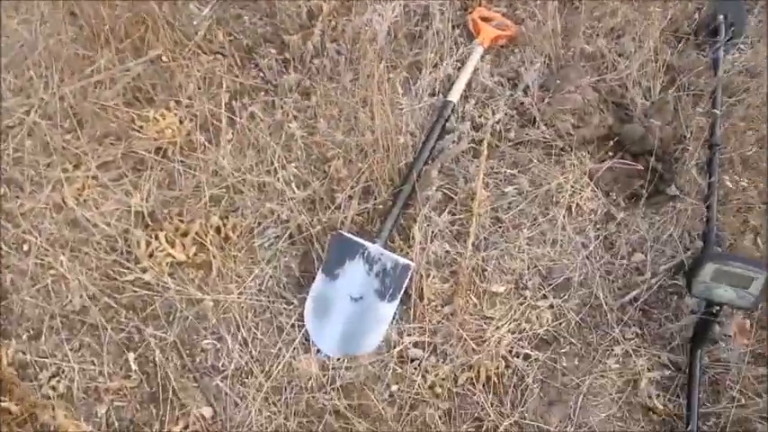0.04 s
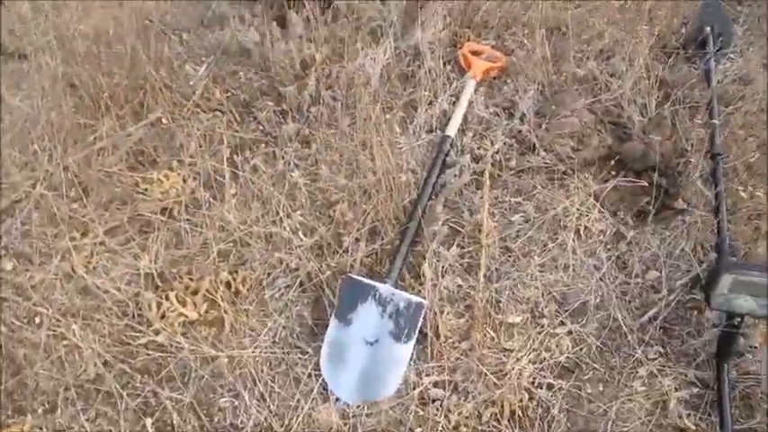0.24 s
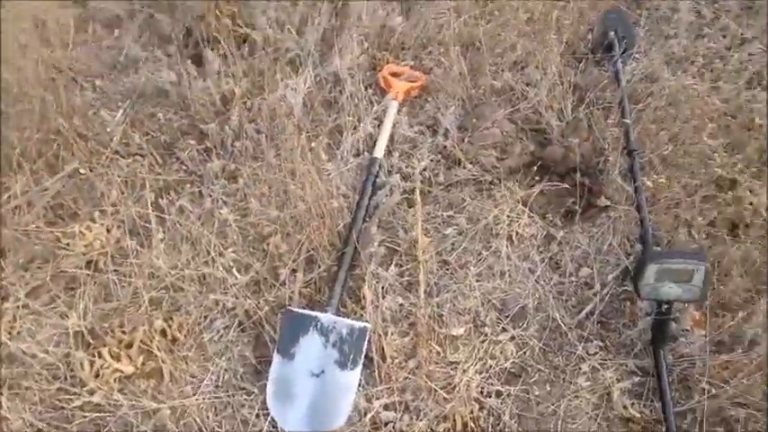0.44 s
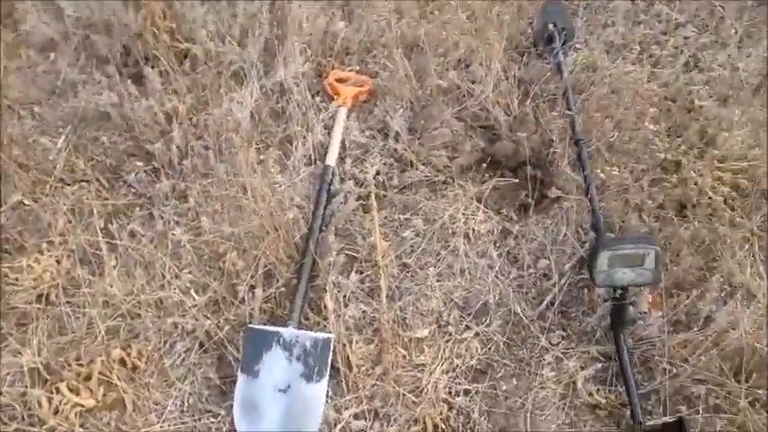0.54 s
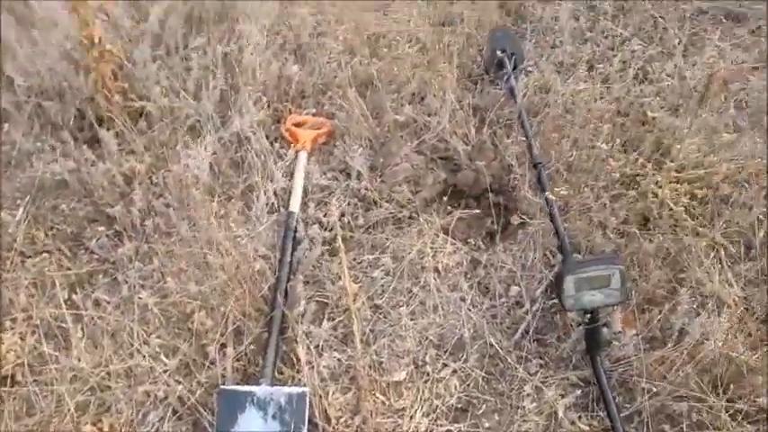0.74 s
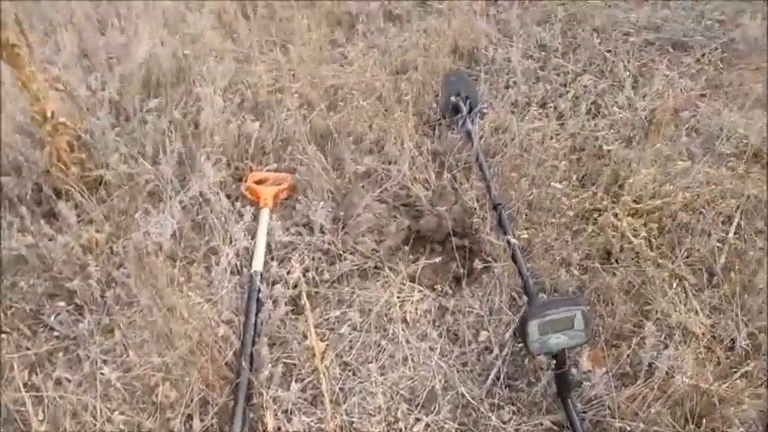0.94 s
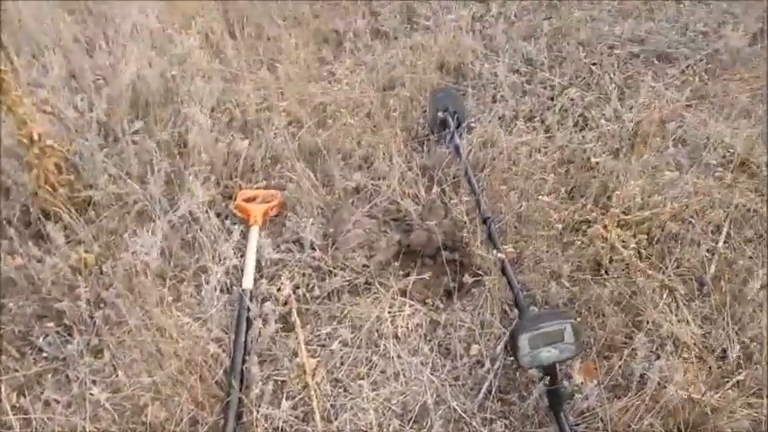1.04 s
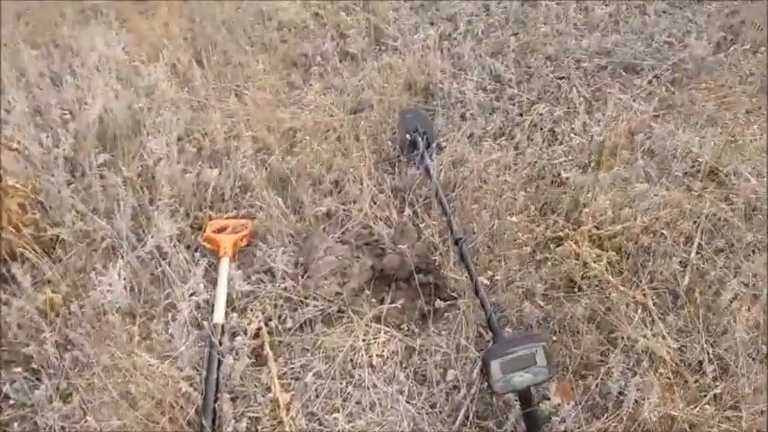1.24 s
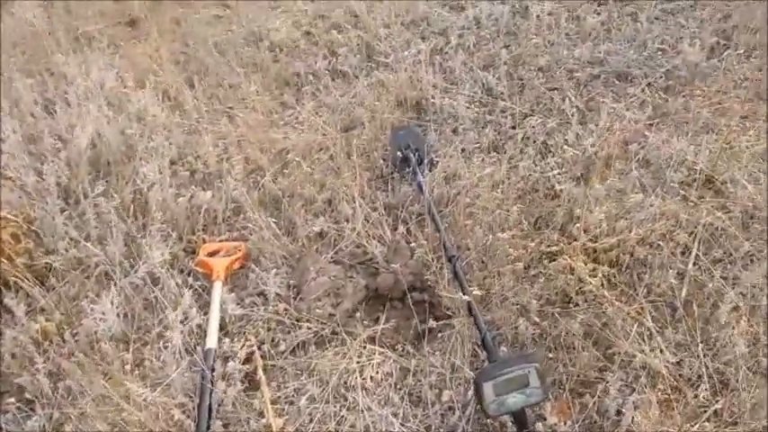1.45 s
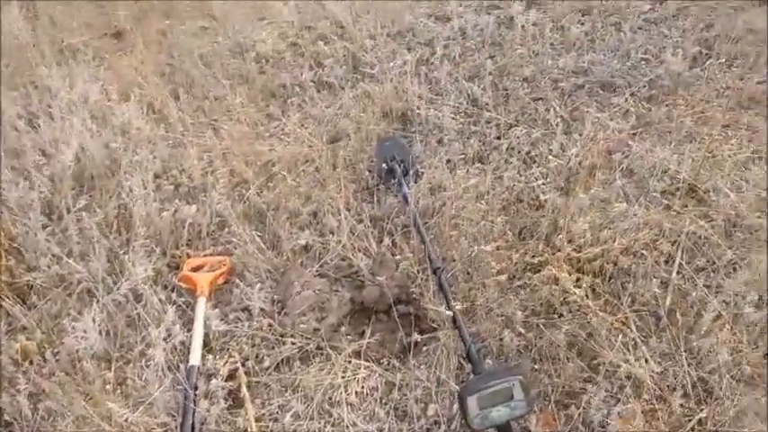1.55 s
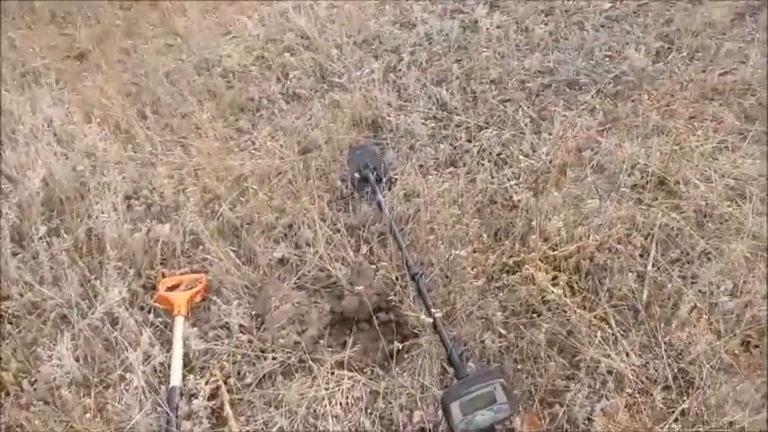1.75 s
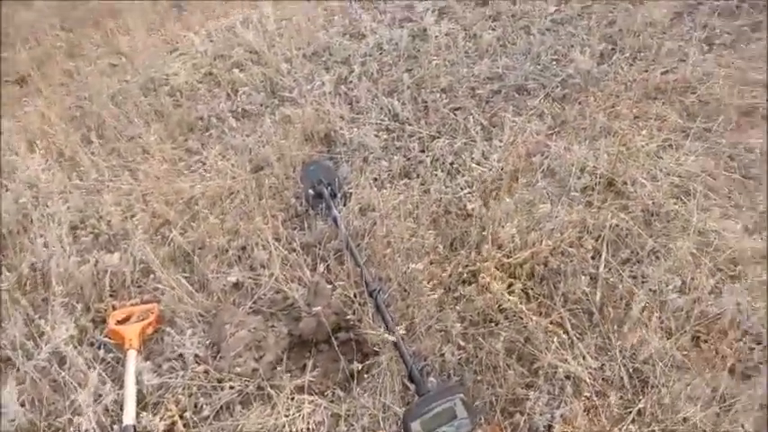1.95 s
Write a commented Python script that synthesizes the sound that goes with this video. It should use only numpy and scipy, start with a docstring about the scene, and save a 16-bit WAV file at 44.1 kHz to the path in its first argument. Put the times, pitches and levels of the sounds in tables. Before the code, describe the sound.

Gusty wind rumbles and thumps on a bare hand-held microphone in an open dry field; a sharp stalk snap and light swishes come early, then a denser grassy crunch near the end.

```python
"""A low, lumpy wind rumble comes first, then gusts thump and flutter on a bare hand-held microphone.
The place is a dry field: boots shift in the grass below, swishing stalks and snapping a few.
Wind is filtered noise and clicks under gust levels, and each thump is a short pressure swing.
Swishes are clumped clicks through a broad resonance; snaps are a click and noise with two short rings.
Far grass adds a faint hiss, and the capsule adds a thin self-noise."""
import sys
import numpy as np
from scipy import signal
from scipy.fft import rfft, irfft
from scipy.io import wavfile
from scipy.ndimage import uniform_filter1d

SR = 44100
rng = np.random.default_rng(int(sys.argv[2]) if len(sys.argv) > 2 else 0)


def to_wav(sig):
    """Store sig (one row per channel, or 1-D mono) as 16-bit WAV at the path in sys.argv[1].

    Samples outside -1..1 are clipped; the rate is SR.
    """
    pcm = np.clip(np.atleast_2d(sig), -1, 1) * 32767
    pcm = np.round(pcm).astype(np.int16)
    wavfile.write(sys.argv[1], SR, pcm.T)  # frames by channels


N = 88464


def gain_of(db):
    """Turns decibels into an amplitude factor."""
    return 10 ** (np.asarray(db) / 20)


def evened(x):
    """Scales a sound to an rms of 1."""
    return x / np.sqrt(np.mean(x ** 2) + 1e-20)


def coloured(x, spectrum):
    """Filters x by a curve of dB over frequency, joined on a log-frequency scale."""
    f, level = np.transpose(spectrum)
    hz = np.fft.rfftfreq(len(x), 1 / SR)
    gain = gain_of(np.interp(np.log(hz + 1), np.log(f + 1), level))
    return irfft(rfft(x) * gain, len(x))


def wander(seconds):
    """Smooth random drift of rms 1 that changes within about the given time."""
    t = np.arange(-4000, 4001) / SR
    bell = np.exp(-(t / seconds) ** 2)
    return evened(signal.fftconvolve(rng.standard_normal(N), bell, "same"))


def clicks(per_s, spread_db, count):
    """Sparse clicks of random sign; a positive spread makes a few much larger, a negative one smaller."""
    chance, side, size = rng.random((count, 3)).T
    # a soft threshold lets some clicks through only in part
    keep = np.clip((per_s / SR - chance) * SR / 30 + .5, 0, 1)
    return keep * np.sign(side - .5) * gain_of(-spread_db * np.log(size + 0.017))


def add(mix, s, sound):
    """Lays a sound into the mix from time s, cut off at the end of the mix."""
    at = max(round(s * SR), 0)
    part = mix[at:at + len(sound)]
    part += sound[:len(part)]


def ring(x, hz, width_hz):
    """Two-pole resonance: a narrower width rings longer."""
    r = np.exp(-np.pi * width_hz / SR)
    return signal.lfilter([1 - r, 0, r - 1], [1, -2 * r * np.cos(2 * np.pi * hz / SR), r * r], x)


# spectrum of the far grass: pitch_hz [Hz], level_db [dB per Hz, relative]
FAR_GRASS_SPECTRUM = [(700, -12.5), (1300, -7), (2000, -10), (3200, -11.5), (5200, -10.5), (6600, -15),
                      (7500, -24.5), (10000, -26), (13800, -26), (15000, -29.5), (16000, -31)]
HISS_DB, HISS_PATCH_DB = -72.5, 1.2  # middle level, rms drift of the level


def hiss():
    """Far grass rustles as faint noise whose level drifts in patches."""
    level = gain_of(HISS_DB + HISS_PATCH_DB * wander(0.27))
    return level * evened(coloured(rng.standard_normal(N), FAR_GRASS_SPECTRUM))


# boots and stalks brushing: start_s [s], length_s [s, time scale of the stroke],
# level_db [dB, before stroke, clumps and microphone tone], centre_hz [Hz],
# width_hz [Hz, before BAND_WIDENING], spread_db [dB, crackle size spread]
BRUSH_STROKES = [(0.311, 0.24, -73, 4620, 2520, -1), (0.452, 0.18, -61, 5100, 3010, -1),
                 (0.606, 0.092, -61, 4570, 650, 1), (0.664, 0.085, -64.5, 5220, 902, 0),
                 (0.713, 0.032, -62, 2720, 495, -7), (1.38, 0.1, -66.5, 4150, 500, 2),
                 (1.395, 0.12, -66, 2020, 199, 2), (1.605, 0.09, -68, 4500, 600, -1.5),
                 (1.692, 0.082, -56.5, 5000, 1800, -1.5), (1.733, 0.061, -49.5, 4700, 3500, 1),
                 (1.735, 0.062, -50.5, 1400, 890, 4), (1.782, 0.12, -70.5, 4530, 2000, -4),
                 (1.93, 0.066, -71.5, 4160, 600, 4)]
SWISH_RISE, BAND_WIDENING = .3, 1.7  # share of the length until the peak, factor on the width
GRAINS_PER_S, SMOOTH_SHARE = 900, .25  # tiny cracks per second, amount of plain noise beside them


def swishes():
    """Clumped tiny cracks ring a broad band while the stroke swells and trails off."""
    out = np.zeros(N)
    clumps = gain_of(1.9 * wander(0.0041))
    for start_s, length_s, level_db, centre_hz, width_hz, spread_db in BRUSH_STROKES:
        grains = evened(clicks(GRAINS_PER_S, spread_db, count=12000))
        grains += SMOOTH_SHARE * rng.standard_normal(12000)
        band_hz = BAND_WIDENING * width_hz
        brushed = evened(ring(ring(grains, centre_hz, band_hz), centre_hz, band_hz))
        u = np.arange(12000) / SR / length_s / SWISH_RISE  # 1 at the peak of the stroke
        stroke = (u * np.exp(1 - u)) ** 1.31
        add(out, start_s, gain_of(level_db) * stroke * brushed)
    return out * clumps


# stalks snapping: start_s [s], level_db [dB, peak before microphone tone], pitch_hz [Hz, main ring],
# second_hz [Hz, second ring], t60_s [s, noise burst falling 60 dB], crack_db [dB, crack against main ring]
STALK_SNAPS = [(0.46, -52, 5670, 5340, .012, -7), (0.4888, -20, 5706, 4530, 0.0097, 0.5),
               (0.4889, -35.5, 2370, 4300, 0.019, -20), (0.531, -56.5, 4330, 4120, 0.0127, -13),
               (0.576, -38, 11750, 12260, 0.0081, -20.5), (0.5776, -41.5, 6230, 5790, 0.0097, -11),
               (1.376, -59, 4100, 4300, .008, -17), (1.4353, -38.5, 1540, 1900, 0.016, -36),
               (1.4355, -53.5, 4230, 2950, .014, -4), (1.451, -54, 2050, 2900, .02, -16),
               (1.692, -50.5, 2840, 2080, 0.0086, -12), (1.704, -52, 5500, 4200, .008, -15),
               (1.713, -33.5, 4960, 7900, 0.0074, -3.5), (1.724, -45.5, 5070, 6500, .01, -14),
               (1.7402, -27.5, 5360, 3400, 0.007, -4.5), (1.748, -41, 4800, 3200, 0.0051, -12),
               (1.753, -39, 5700, 2540, 0.036, -7.5), (1.776, -41, 3590, 6100, 0.011, -9),
               (1.79, -47, 3530, 5200, 0.0099, -10), (1.932, -47.5, 4140, 5000, 0.008, -17)]
RING_WIDTH_HZ, SECOND_DB = 450, -5  # width of the first resonance, second ring against the main one
BREAK_S = 0.0003  # build-up time of the noise burst
OPENING_CLICK = 3.7  # height of the click that opens each snap


def snaps():
    """A stalk breaks in a quick burst of fibres: a dry crack and two short rings."""
    out, t = np.zeros(N), np.arange(2000) / SR
    all_fibres = rng.standard_normal((len(STALK_SNAPS), 2000))
    for snap, fibres in zip(STALK_SNAPS, all_fibres):
        start_s, level_db, pitch_hz, second_hz, t60_s, crack_db = snap
        burst = fibres * (1 - np.exp(-t / BREAK_S)) * gain_of(-60 * t / t60_s)
        burst[0] = OPENING_CLICK
        main, second = [evened(ring(ring(burst, hz, RING_WIDTH_HZ), hz, 2 * RING_WIDTH_HZ))
                        for hz in (pitch_hz, second_hz)]
        tone = main + gain_of(SECOND_DB) * second + gain_of(crack_db) * evened(burst)
        add(out, start_s, gain_of(level_db) * tone / abs(tone).max())
    return out


# microphone tone for the grass underfoot: pitch_hz [Hz], level_db [dB]
MICROPHONE_TONE = [(400, -27), (1400, -2.5), (1900, -7), (2500, -4.5), (3300, -1), (4400, 0), (5700, -1),
                   (6800, -3.5), (7800, -10), (10000, -20), (13500, -22.5), (15200, -26), (16000, -30.5)]


def grass_underfoot():
    """Swishes and snaps below, with the microphone's tone curve filtering both."""
    return coloured(swishes() + snaps(), MICROPHONE_TONE)


# wind on the microphone: start_s [s], rumble_db [dB, before RUMBLE_DB], flutter_db [dB, before FLUTTER_DB]
GUST_LEVELS = [(0.0, -32.5, -49), (0.131, -34, -46.5), (0.16, -21, -37), (0.199, -26.5, -44.5),
               (0.219, -28, -39), (0.288, -31, -63), (0.33, -28, -45), (0.389, -40.5, -65),
               (0.419, -26, -46.5), (0.465, -58.5, -73), (0.5, -32, -43), (0.529, -32, -63.5),
               (0.582, -16.5, -27.5), (0.62, -28.5, -42.5), (0.7, -19.5, -31), (0.735, -19, -37),
               (0.779, -36.5, -42), (0.789, -23, -41.5), (0.87, -25, -38), (0.9, -25, -42),
               (0.91, -32.5, -46), (0.939, -17, -30.5), (0.96, -34, -49.5), (0.978, -21.5, -45.5),
               (1.19, -37, -47.5), (1.21, -30, -49.5), (1.31, -36, -55.5), (1.328, -24.5, -45.5),
               (1.36, -35, -50), (1.391, -24, -43), (1.41, -30.5, -52), (1.452, -27.5, -31),
               (1.5, -31, -49), (1.542, -24.5, -45), (1.562, -33.5, -57), (1.581, -18.5, -32.5),
               (1.609, -38, -45.5), (1.649, -23.5, -49.5), (1.75, -38.5, -44), (1.791, -24, -41),
               (1.849, -45, -50.5), (1.881, -26, -61), (1.901, -37.5, -51.5), (2.0, -30, -64)]
# spectrum of the large eddies: pitch_hz [Hz], level_db [dB per Hz, relative]
RUMBLE_SPECTRUM = [(12, -51.5), (20, -8.5), (38, -10), (80, 5), (114, 6.5), (190, 0), (308, -9),
                   (338, -12.5), (409, -17), (500, -22), (650, -36.5), (1100, -120)]
# spectrum of the small eddies: pitch_hz [Hz], level_db [dB per Hz, relative]
FLUTTER_SPECTRUM = [(100, -32.5), (200, -4), (300, -8.5), (500, -22.5), (800, -29.5), (1200, -42),
                    (1700, -73.5), (2400, -99.5)]
RUMBLE_DB, FLUTTER_DB = -0.5, 0.5  # added to the gust levels
LUMP_DB, LUMP_S = 2., .015  # rms and time of the lumps; the small eddies take half the time
EDDIES_PER_S, EDDY_SPREAD_DB = 450, 3.3


def wind():
    """Lumpy rumble of large eddies and a flutter of small ones."""
    start_s, rumble_db, flutter_db = np.array(GUST_LEVELS).T
    t = np.arange(N) / SR
    rumble_level = gain_of(RUMBLE_DB + np.interp(t, start_s, rumble_db))
    flutter_level = gain_of(FLUTTER_DB + np.interp(t, start_s, flutter_db))
    large = rng.standard_normal(N) * gain_of(LUMP_DB * wander(LUMP_S))
    small = clicks(EDDIES_PER_S, EDDY_SPREAD_DB, count=N) * gain_of(LUMP_DB * wander(LUMP_S / 2))
    rumble = rumble_level * evened(coloured(large, RUMBLE_SPECTRUM))
    flutter = flutter_level * evened(coloured(small, FLUTTER_SPECTRUM))
    return rumble + flutter


# single eddies that thump the microphone: centre_s [s], level_db [dB, nominal peak], pitch_hz [Hz],
# cycles [count, more is longer], way [push +1 or pull -1]
EDDY_THUMPS = [(0.1502, -9, 238, 0.98, 1), (0.5862, -6, 379, 0.45, 1), (.558, -31.5, 490, 1.4, 1),
               (0.676, -24, 424, 1.27, 1), (.716, -21.5, 590, 1.14, 1), (.600, -16, 404, 0.62, 1),
               (.694, -18, 300, 2.1, 1), (0.7081, -14, 240, 0.89, 1), (0.8954, -14, 257, 0.95, 1),
               (.8995, -25, 595, 1.22, 1), (.849, -19, 300, 1.4, 1), (.987, -29.5, 464, 1.27, 1),
               (1.508, -36, 400, 0.8, 1), (0.723, -10, 167.8, 1.54, 1), (.745, -10.5, 216, 1.4, 1),
               (.742, -23, 531, 1.3, -1), (.802, -22.5, 144.4, 2.4, -1), (0.9018, -11, 215.6, 0.91, -1),
               (0.9286, -24.5, 485, 1.07, -1), (0.9381, -15.5, 260, 0.97, -1), (1, -14.5, 144, 0.62, 1),
               (1.222, -28.5, 413, 1.12, 1), (1.331, -26.5, 350, 1.06, -1), (1.4372, -34, 690, 1.7, 1),
               (0.492, -42.5, 520, 3.2, 1), (1.458, -11, 211, 1.21, -1), (1.484, -23.5, 350, 1.06, -1),
               (1.578, -16.5, 181, 1.63, -1), (1.657, -16.5, 108, 1.3, 1), (1.794, -16.5, 203, 1.03, 1),
               (1.8807, -24, 313, 1.15, -1), (1.928, -23.5, 168, 0.79, 1)]


def buffets():
    """Each eddy is one short pointed pressure swing that overshoots."""
    out, t = np.zeros(N), np.arange(-800, 800) / SR
    window = np.hanning(1600)
    for centre_s, level_db, pitch_hz, cycles, way in EDDY_THUMPS:
        pointed = 1 / np.cosh(3.75 * pitch_hz * t / cycles)
        swing = np.cos(2 * np.pi * pitch_hz * t - .25) * pointed * np.sqrt(window)
        balanced = swing - swing.sum() * window / 800  # almost no net push remains
        add(out, centre_s - 800 / SR, np.sign(way) * gain_of(level_db) * balanced)
    return out


YIELD_DB = -22  # smoothed thump level at which the random wind halves


def scene():
    """Far hiss, grass underfoot and wind; the random wind dips while a thump sounds."""
    thumps = buffets()
    thump_level = uniform_filter1d(uniform_filter1d(abs(thumps), size=200), size=200)
    wind_dip = 1 / (1 + thump_level / gain_of(YIELD_DB))
    mix = wind_dip * wind() + thumps + grass_underfoot() + hiss()
    return mix[None]


SELF_NOISE_DB, SELF_NOISE_HZ, SELF_NOISE_WIDTH_HZ = -87, 15100, 900  # level before the band limit
EDGE_HZ = 15750  # band limit


def record(dry):
    """The capsule's thin self-noise near the top of its range, then the band limit."""
    noise = rng.standard_normal(N)
    for _ in range(2):
        noise = ring(noise, SELF_NOISE_HZ, SELF_NOISE_WIDTH_HZ)
    heard = dry + gain_of(SELF_NOISE_DB) * evened(noise)
    band_limit = signal.firwin(511, EDGE_HZ, window=("kaiser", 9), fs=SR)
    return signal.oaconvolve(heard, band_limit[None], "same")


dry = scene()
out = record(dry)
to_wav(out)
```